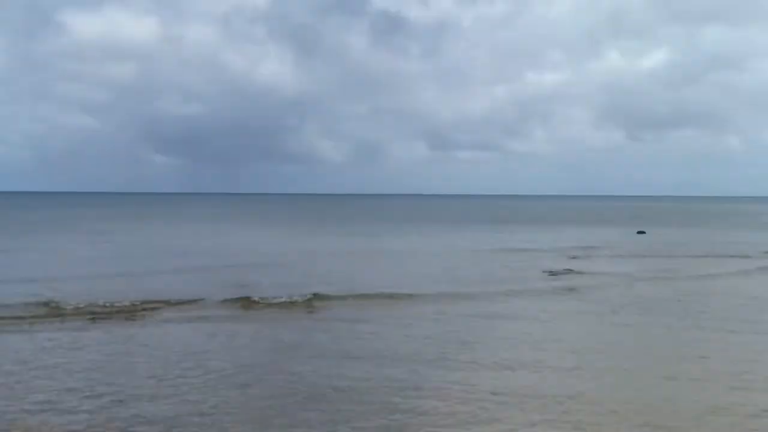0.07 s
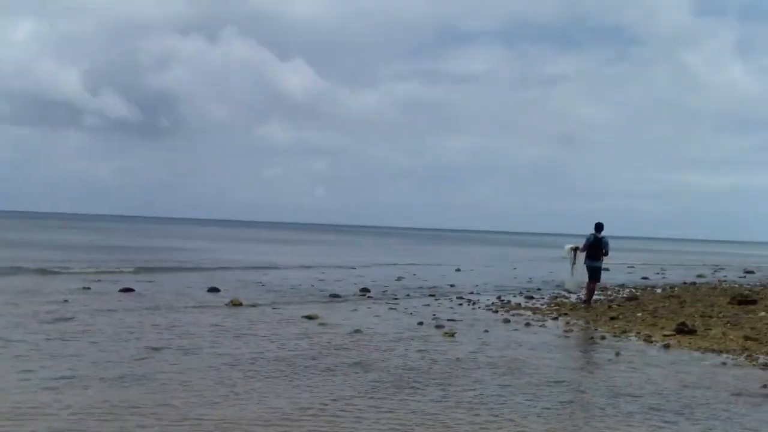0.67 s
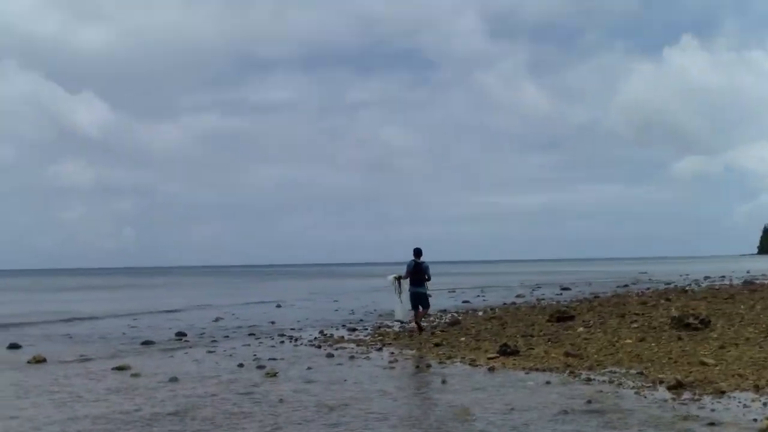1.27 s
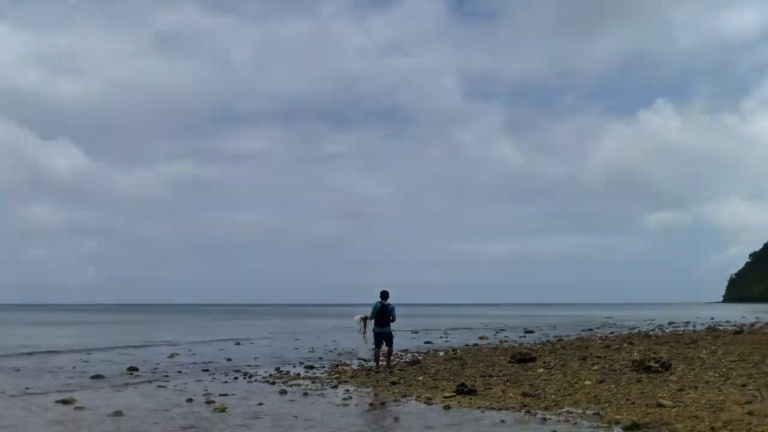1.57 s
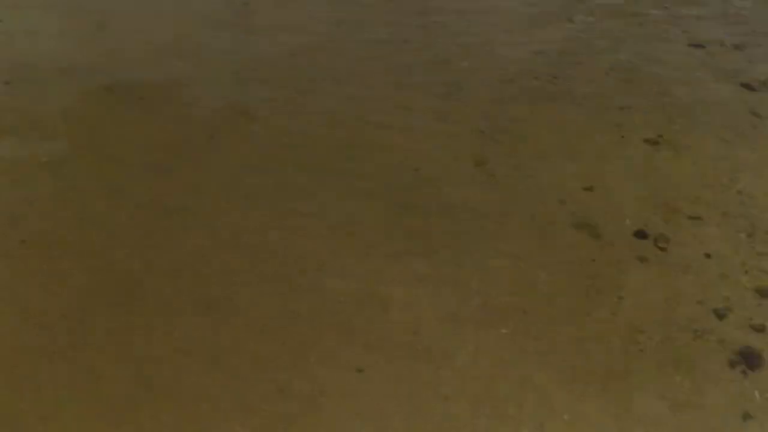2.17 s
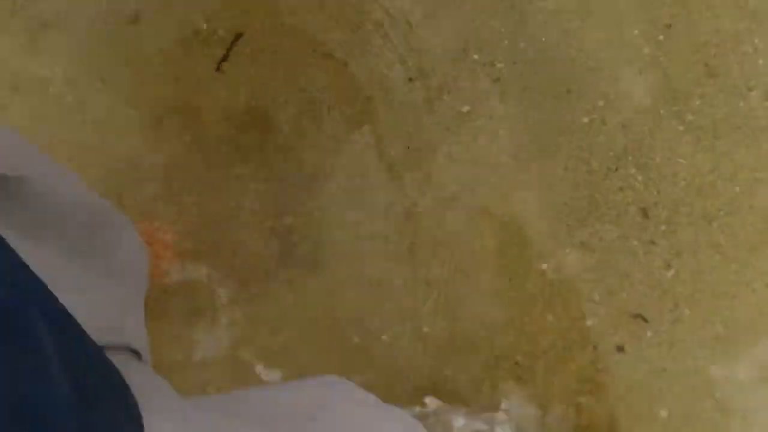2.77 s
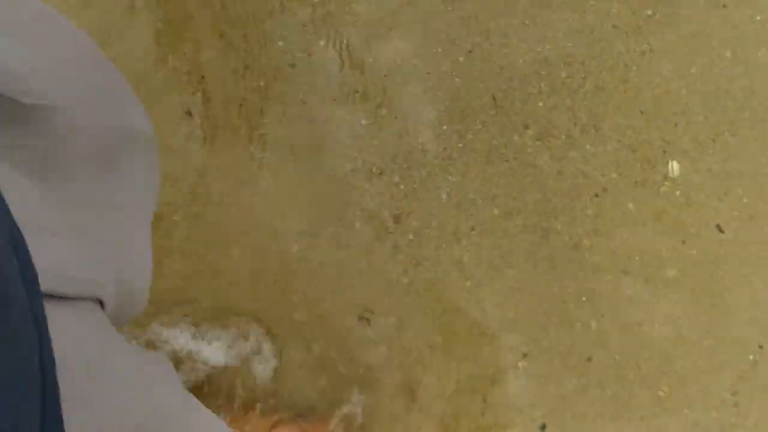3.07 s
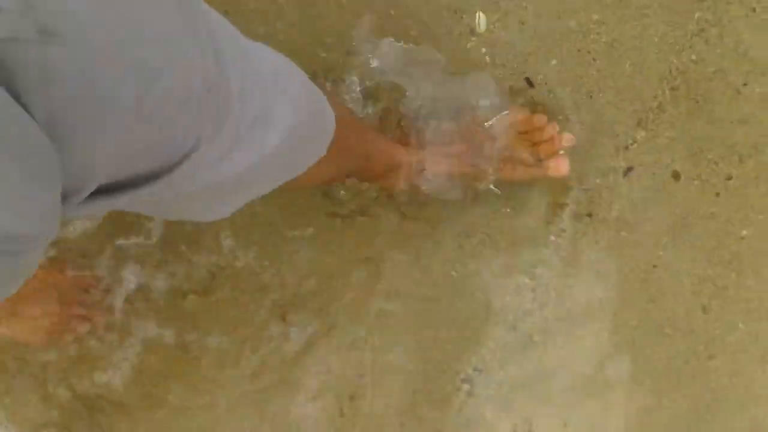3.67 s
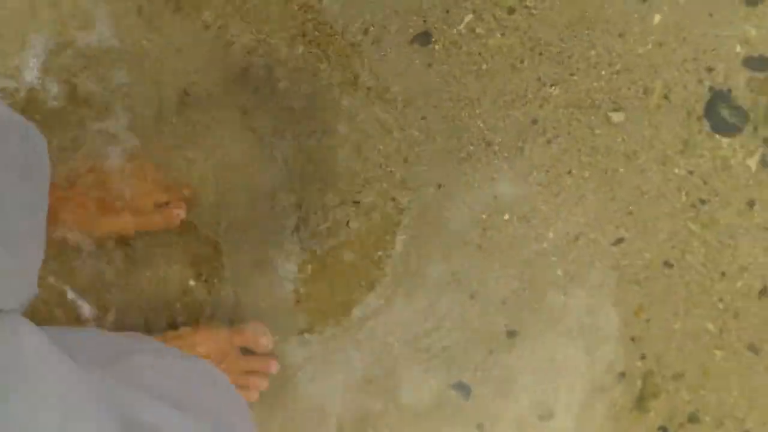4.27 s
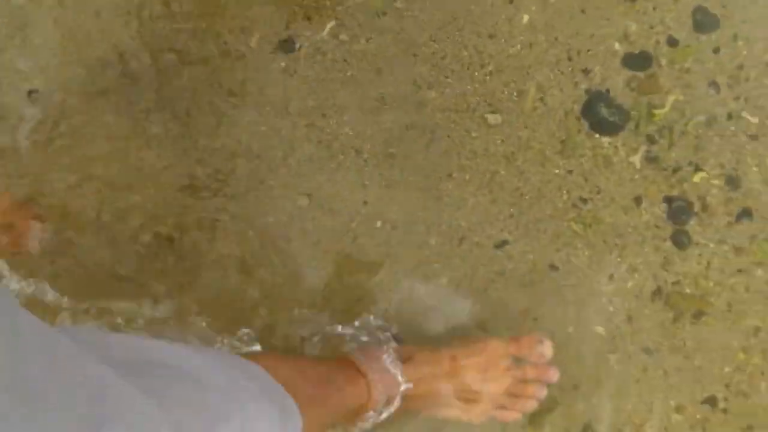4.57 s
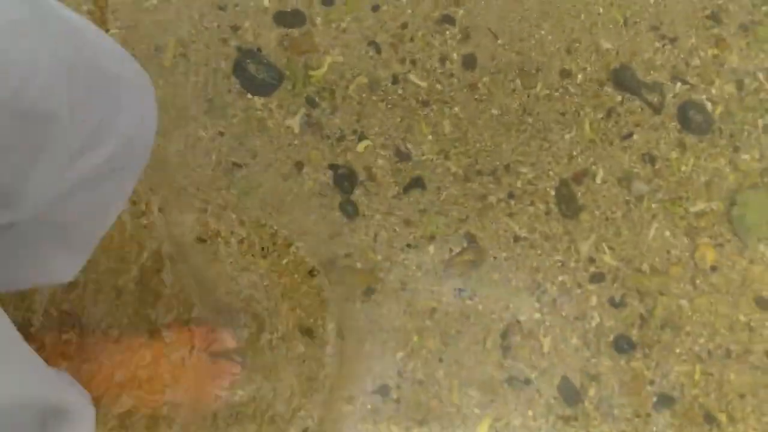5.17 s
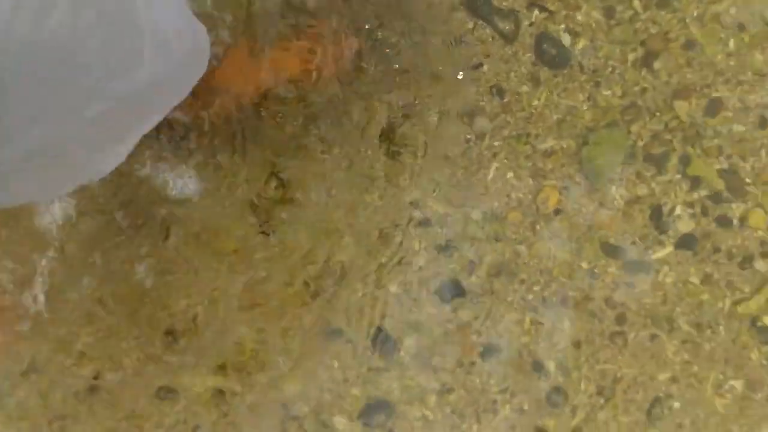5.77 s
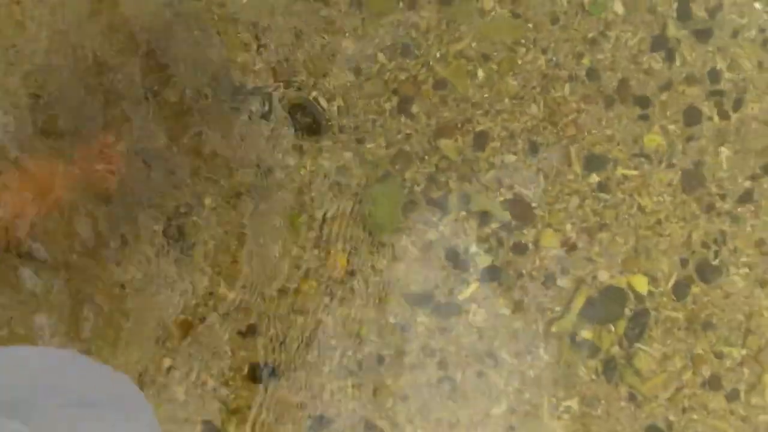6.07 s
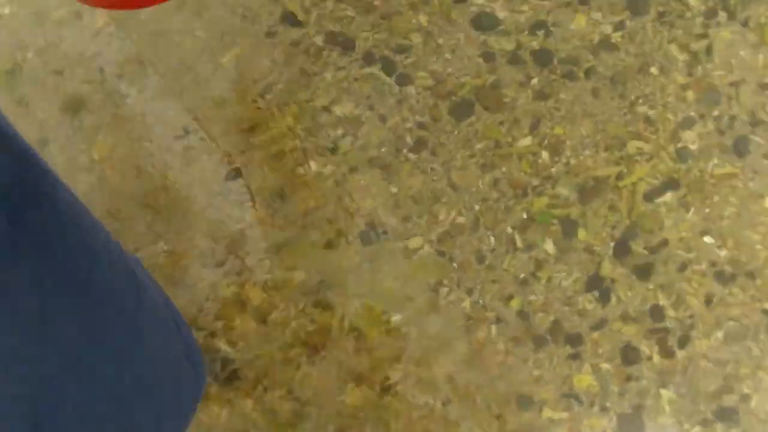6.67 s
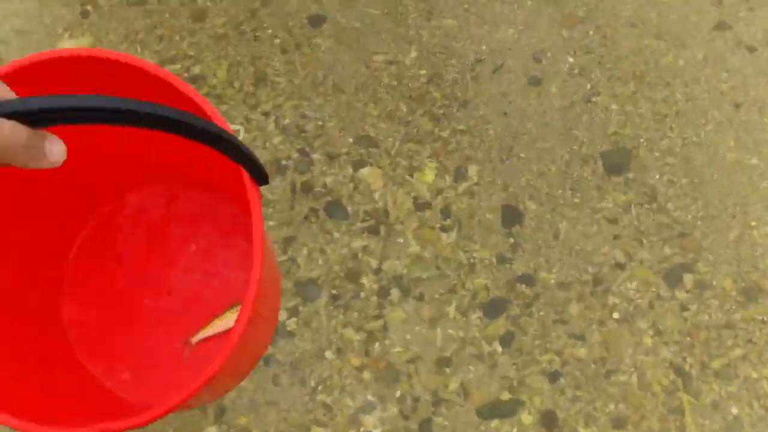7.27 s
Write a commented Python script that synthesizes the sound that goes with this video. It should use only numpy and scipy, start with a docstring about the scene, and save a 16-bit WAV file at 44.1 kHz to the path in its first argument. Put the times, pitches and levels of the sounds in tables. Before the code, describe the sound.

At the edge of a calm sea, wind rumbles and flutters against the microphone, briefly overloading it, over a faint wash of little waves. Then close, unhurried steps push through shallow water, about seven in all, each a swishing slosh with gulps, plops and bright falling droplets. The buffeting is heaviest in the first half and comes back in lighter puffs between the splashes.

```python
"""At the seashore, bare feet wade through ankle-deep water, about one stride a second, close by.
Each stride folds air into the water, which rings as bubbles, gulps and plops, and throws spray
that patters back. Small waves wash the shore behind. Gusts buffet the microphone with rumble,
flutter and thumps, and the hardest ones overload it into thin crackles."""
import sys
import numpy as np
from scipy.fft import rfft, irfft, next_fast_len
from scipy.io import wavfile
from scipy.ndimage import uniform_filter1d, map_coordinates

SR = 44100
rng = np.random.default_rng(int(sys.argv[2]) if len(sys.argv) > 2 else 0)


def file_out(sig):
    """Save sig as 16-bit WAV at sys.argv[1]."""
    # one column per channel
    cols = np.atleast_2d(sig).T
    # limit, then scale
    lim = np.clip(cols, -1, 1)
    pcm = np.round(lim * 32767).astype(np.int16)
    wavfile.write(sys.argv[1], SR, pcm)


N = 327222

# the microphone turns from the open sea down to the feet: time_s, nearness (0 far, 1 close)
NEARNESS = [(0, .4), (.7, .15), (1.9, .15), (2.3, .8), (2.9, 1), (7.42, 1)]


def stride_db(t, build_s, hold_s, settle_s):
    """A leg gathers speed, pushes steadily and stops; t counts from the full push."""
    sweep_db, bend = 12.5, 1.17  # depth of the build-up and settling; steepening of the tails
    away = np.maximum(-t / build_s, 0) + np.maximum((t - hold_s) / settle_s, 0)
    return -sweep_db * np.minimum(away, 10) ** bend


def water_levels():
    """Slosh and spray envelopes in dB: strides and splashes over a bed of shore waves."""
    # a leg sweeps the water: push_s, build_s, hold_s, settle_s, slosh_db, spray_db, spray_lag_s
    strides = [(2.168, .24, 0.12, .28, -41.5, -45, 0.077), (2.968, .19, 0.16, .07, -40.5, -42.5, 0.043),
               (3.611, 0.34, .28, 0.11, -40, -42, 0), (4.776, 0.61, 0.066, 0.22, -41.5, -41.5, 0),
               (5.574, 0.35, 0.15, 0.22, -39.5, -42, 0.022), (6.535, 0.25, 0.23, 0.14, -38, -40, 0.017),
               (7.328, 0.09, 0.031, .06, -49, -43.5, 0.0051)]
    # a foot breaks the surface: peak_s, slosh_db, spray_db
    splashes = [(2.185, -36, -55), (2.725, -37, -45), (3.439, -42.5, -38.5), (3.93, -41, -47.5),
                (4.365, -47.5, -44.5), (4.832, -38.5, -41.5), (4.97, -40.5, -58), (5.585, -46, -35.5),
                (5.87, -46, -48), (6.369, -41.5, -41.5)]
    # small waves; twice the level drops abruptly and creeps back: time_s, wash_db, hiss_db
    shore_waves = [(0, -47.5, -51.5), (.152, -50, -47.5), (.172, -60, -61.5), (.57, -57.5, -60.5),
                   (.83, -50, -50), (.92, -52, -54), (1.22, -47.5, -48.5), (1.29, -54.5, -53),
                   (1.52, -50.5, -54.5), (1.545, -60, -65.5), (1.7, -56, -57), (1.87, -52.5, -59.5),
                   (2.05, -46.5, -49.5), (2.6, -51.5, -53), (2.82, -45.5, -48.5), (3.25, -50, -52),
                   (4.1, -51.5, -52), (5.2, -49.5, -54), (6.15, -54.5, -51.5), (7.05, -46.5, -48.5),
                   (7.42, -45, -48.5)]
    attack_s, t60_s = 0.018, 0.34  # splash envelope
    t = np.arange(N) / SR
    sloshes, sprays = ([level] for level in curves(shore_waves))
    for s, build_s, hold_s, settle_s, slosh_db, spray_db, lag_s in strides:
        sloshes.append(slosh_db + stride_db(t - s, build_s, hold_s, settle_s))
        sprays.append(spray_db + stride_db(t - s - lag_s, build_s, hold_s, settle_s))
    for s, slosh_db, spray_db in splashes:
        away = np.maximum((s - t) / attack_s, (t - s) / t60_s)
        shape_db = -60 * np.minimum(away, 2)
        sloshes.append(slosh_db + shape_db)
        sprays.append(spray_db + shape_db)
    return together(sloshes), together(sprays)


def slosh(slosh_db):
    """Water folds round the shins: a rush full of bubbles, and deep gulps when the push is hard."""
    near, = curves(NEARNESS)  # far water blurs into a smooth wash
    push = near * np.clip((slosh_db + 55) / 16, 0, 1)  # 0 = lapping ripples, 1 = full stride
    # tone of churning water: frequency_hz, level_db
    rush_spectrum = [(120, -13), (300, -5), (520, -3), (1050, 0), (1700, -4.5), (2800, -10.5), (4500, -29),
                     (8000, -19.5), (16000, -77)]
    rush = amp(-2.5 - 3.5 * push + 2.5 * push * wobble(60)) * noise(rush_spectrum)
    fine = swarm(per_s=320, lo_hz=1406, hi_hz=3197, cycles=49, rise=0.1, spread_db=5, samples=1400)
    bubbles = swarm(per_s=220, lo_hz=647.6, hi_hz=1729, cycles=28, rise=0.3, spread_db=2.5, samples=2100)
    gulps = swarm(per_s=90, lo_hz=311.7, hi_hz=850, cycles=37, rise=0.39, spread_db=2.5, samples=3000)
    fine *= push * amp(-5)
    bubbles *= amp(-11 + 4.8 * near + 3.45 * push)
    gulps *= amp(-11.5 + 8.3 * push)
    return amp(slosh_db) * (rush + fine + bubbles + gulps)


def spray(spray_db):
    """Thrown water patters back as tiny drops over a fine fizz; a harder splash is more grainy."""
    # fine mist, with a sheen from the microphone port ringing near 9.6 kHz: frequency_hz, level_db
    fizz_spectrum = [(900, -6), (2200, 3), (3300, -1), (5200, -2.5), (6300, -5.5), (7700, -6.5),
                     (8900, -2.5), (9600, 2), (10700, -4), (12000, -10.5), (14000, -12.5), (16000, -17)]
    # tone of the landing droplets: frequency_hz, level_db
    patter_spectrum = [(1500, -25), (3000, -6.5), (4500, -6), (6300, -9), (8000, -4), (9600, 2),
                       (10800, -2), (12000, -11), (16000, -9)]
    near, = curves(NEARNESS)
    thrown = near * np.clip((spray_db + 58) / 15, 0, 1)  # 0 = distant hiss, 1 = spray at the feet
    fizz = amp(1.5 - 4.9 * thrown) * noise(fizz_spectrum)
    droplets = swarm(per_s=2000, lo_hz=2980, hi_hz=13530, cycles=32, rise=0.06, spread_db=5, samples=320)
    patter = thrown * amp(-1) * coloured(droplets, patter_spectrum)
    clumps = amp(2.85 * thrown * wobble(120))  # sheets of water break up in bunches
    return amp(spray_db - 1) * clumps * (fizz + patter)


def plops():
    """An air cavity slaps shut and rings, its pitch rising."""
    # single large bubbles: start_s, level_db, pitch_hz
    cavities = [(.034, -39, 944), (0.537, -40, 1016), (0.553, -40.5, 637), (1.936, -35.5, 650),
                (2.186, -27, 1250), (2.26, -37, 854), (2.305, -32.5, 367), (2.825, -32.5, 1620),
                (2.963, -26, 1127), (3.158, -32.5, 714), (3.289, -36.5, 1430), (3.595, -25.5, 1010),
                (3.61, -24.5, 1930), (3.762, -31, 680), (3.844, -32, 334), (3.921, -31.5, 1910),
                (3.966, -35, 617), (4.285, -36, 825), (4.368, -30.5, 1570), (4.751, -28, 422),
                (4.826, -28, 1390), (5.186, -36, 726), (5.262, -36, 520), (5.316, -32.5, 816),
                (5.515, -27, 974), (5.59, -24.5, 2100), (5.62, -26.5, 630), (5.724, -29, 437),
                (5.881, -36, 545), (6.353, -30.5, 690), (6.454, -31.5, 1470), (6.56, -26, 817),
                (6.584, -29.5, 910), (6.65, -28.5, 1290), (6.726, -27.5, 342), (6.728, -25, 970),
                (6.797, -28, 486), (6.829, -32, 1070), (7.118, -35, 1010), (7.33, -25.5, 2146),
                (7.383, -34, 1540)]
    out, t = np.zeros(N), np.arange(SR // 8) / SR
    for s, db, hz in cavities:
        slap = amp(-11) * splat(t, hz, t60_s=0.069)
        ring = bubble(t, hz * .97, cycles=33.3, rise=0.27)
        add(out, s, amp(db + 4) * (ring + slap))
    return out


def drops(scatter_s=0.018):
    """A big drop: a smack and the ping of its bubble, among smaller droplets that land around it."""
    # drops hitting the surface: start_s, level_db, pitch_hz
    big_drops = [(.0975, -32, 4540), (0.276, -36.5, 5030), (1.427, -35.5, 3620), (2.307, -22, 9200),
                 (2.962, -24, 9600), (3.6669, -21, 9200), (3.8252, -13.5, 9300), (3.8746, -31, 4040),
                 (4.7863, -26.5, 2910), (4.833, -21, 10000), (4.855, -21, 9600), (4.9025, -25, 9400),
                 (4.965, -18, 9000), (4.9844, -25.5, 4080), (5.625, -25, 5100), (5.765, -19, 9300),
                 (5.8855, -26.5, 10000), (6.3718, -25.5, 2640), (6.6937, -23, 3060), (6.7114, -19, 9700),
                 (6.764, -22, 2840), (6.7984, -25.5, 2530), (6.868, -24.5, 4360), (6.9304, -25, 9600),
                 (7.348, -20, 10200)]
    out, t = np.zeros(N), np.arange(SR // 20) / SR
    for s, db, hz in big_drops:
        smack = amp(-7.5) * splat(t, hz, t60_s=0.012)
        ping = amp(2.5) * bubble(t, hz, cycles=36.6, rise=.04)
        add(out, s + 0.00057, amp(db) * (smack + ping))
        for delay, pitch, softness in rng.random((7, 3)):
            droplet = bubble(t, hz * (0.77 + .45 * pitch), cycles=32, rise=.06)
            add(out, s + scatter_s * (delay - .1), amp(db - 11 - 10 * softness) * droplet)
    return out


def bubble(t, hz, cycles, rise):
    """A trapped air pocket: soft start, 60 dB down after its cycles, pitch rising as it surfaces."""
    age = t * hz / cycles
    tone = np.sin(2 * np.pi * hz * t * (1 + rise * age / 2))
    attack = 1 - np.exp(-2 * t * hz)
    return tone * amp(-60 * age) * attack


def swarm(per_s, lo_hz, hi_hz, cycles, rise, spread_db, samples):
    """A cloud of bubbles of random pitch, life and strength; rms 1, even power per octave."""
    when, pitch, life, softness = rng.random((int(per_s * N / SR), 4)).T[:, :, None]
    hz = lo_hz * (hi_hz / lo_hz) ** pitch
    gain = np.sqrt(hz) * amp(-spread_db * np.log(softness + 0.0083))  # a few stand out
    k = np.arange(samples)
    fade = 1 - (k / samples) ** 2
    rings = gain * bubble(k / SR, hz, cycles * 2 ** (life - .5), rise) * fade
    positions = (when * N).astype(int) + k
    return unit(np.bincount(positions.ravel(), rings.ravel(), N)[:N])


def splat(t, hz, t60_s):
    """A short slap of water: dying noise about an octave wide around hz."""
    band = [(hz / 5, -45), (hz / 1.7, -7), (hz, 0), (hz * 1.3, -6), (hz * 7, -42)]
    return amp(-60 * t / t60_s) * noise(band, len(t))


def wind():
    """Slow pressure swings and faster eddies; the hardest gusts break into a higher flutter."""
    # wind on the microphone in three bands, low to high: frequency_hz, level_db
    rumble_spectrum = [(8, -18), (22, 4), (42, 0.5), (65, -6), (90, -10), (150, -35), (400, -81),
                       (900, -120)]
    eddy_spectrum = [(35, -52), (70, -3), (100, -1.5), (135, -6.5), (180, -15), (260, -24.5), (400, -42),
                     (1000, -63), (4000, -110)]
    flutter_spectrum = [(80, -11), (150, 3), (210, 0), (290, -5), (380, -16.5), (520, -20), (1000, -40),
                        (4000, -59), (12000, -90)]
    buffet_db, eddy_db = wind_levels()
    gust = np.clip((eddy_db + 31.5) / 16, 0, 1)
    rumble = amp(buffet_db + 4 * wobble(22)) * turbulence(rumble_spectrum, steady_s=0.1056)
    eddies = amp(3.2 * wobble(35)) * turbulence(eddy_spectrum, steady_s=0.038)
    flutter = amp(-22 + 18.2 * gust + 6.9 * wobble(50)) * turbulence(flutter_spectrum, steady_s=0.0426)
    return rumble + amp(eddy_db) * (eddies + flutter)


def wind_levels():
    """Buffeting and eddy envelopes in dB: the breeze plus a bell-shaped swell for each gust."""
    # the bed of moving air: time_s, buffet_db, eddy_db
    breeze = [(0, -31, -53), (.08, -34, -43), (.3, -33, -44), (.66, -31, -44.5), (.78, -24.5, -27),
              (1.8, -24, -26.5), (1.93, -21.5, -37), (2.27, -26.5, -37.5), (3.08, -22.5, -27),
              (3.23, -29.5, -49), (3.88, -29, -44), (4.1, -41, -63), (4.55, -30.5, -47), (5.32, -49.5, -62),
              (5.47, -39.5, -63), (5.84, -27, -45), (6.1, -44.5, -66), (6.4, -30.5, -53),
              (7.15, -33.5, -61), (7.42, -21, -47)]
    # swells on top of it: middle_s, half_length_s, buffet_db, eddy_db
    gusts = [(0.16, 0.037, -15.5, -23.5), (0.896, 0.026, -26, -23.5), (1.238, 0.019, -16, -18),
             (1.373, .04, -21.5, -22.5), (1.523, 0.013, -14, -20), (1.713, 0.046, -19, -19),
             (1.819, 0.035, -14.5, -24.5), (2.198, 0.037, -20.5, -26.5), (2.458, 0.036, -16, -26),
             (2.622, 0.009, -12.5, -31.5), (2.745, 0.019, -16, -19.5), (2.938, 0.023, -13.5, -21),
             (3.142, 0.023, -15.5, -25.5), (3.286, 0.028, -19, -32), (3.492, 0.038, -16.5, -27),
             (3.659, 0.015, -40, -30), (3.779, 0.036, -17.5, -32.5), (4.342, 0.059, -25.5, -36.5),
             (4.443, .035, -18.5, -32), (4.756, 0.024, -25.5, -25), (4.871, 0.024, -21.5, -40),
             (5.514, .03, -30.5, -49), (5.87, 0.024, -23, -41), (6.332, 0.047, -24.5, -22.5),
             (6.556, 0.022, -30, -38), (6.676, 0.031, -23, -33.5), (6.901, 0.044, -25, -34.5),
             (7.055, 0.02, -24, -31), (7.3, 0.052, -21.5, -34), (7.373, 0.038, -14.5, -38)]
    t = np.arange(N) / SR
    power = amp(curves(breeze)) ** 2
    for s, half_s, buffet_db, eddy_db in gusts:
        swell = np.exp(-2 * np.minimum(((t - s) / half_s) ** 2, 20))
        power += amp([[buffet_db], [eddy_db]]) ** 2 * swell
    return 10 * np.log10(power)


def turbulence(spectrum, steady_s):
    """Lumpy pressure noise whose strength stays even over spans longer than steady_s."""
    pressure = noise(spectrum)
    local_power = np.abs(uniform_filter1d(pressure ** 2, int(steady_s * SR)))
    return pressure / np.sqrt(local_power + 0.005)


def puffs(swing_s=0.0015):
    """An eddy hits the microphone head-on, pushing and pulling its diaphragm; two weaker ones follow."""
    # sudden slaps of wind: time_s, level_db
    slaps = [(0.877, -6.5), (1.034, -15), (1.241, -6.5), (1.343, -9.5), (1.389, -9), (1.508, -4.5),
             (1.596, -12.5), (1.702, -11.5), (1.748, -11), (1.824, -10), (2.344, -10.5), (2.422, -16),
             (2.451, -16), (2.542, -13.5), (2.722, -10), (2.764, -7), (2.828, -11.5), (2.92, -8.5),
             (2.992, -13), (3.056, -11), (3.472, -16.5)]
    out, t = np.zeros(N), np.arange(SR // 25) / SR - .02
    for s, db in slaps:
        for k, (late, width) in enumerate(rng.random((3, 2))):
            u = t / (swing_s * 2 ** (1.34 * (width - .5)))
            push_pull = u / (1 + u ** 2 / 5) ** 4
            lag_s = k * (0.00509 + 0.007 * late)
            add(out, s - .017 + lag_s, amp(db + 5 - 6.9 * k) * push_pull)
    return out


def crackle(t60_s=0.0038):
    """A gust overloads the microphone; each overload leaves one dry tick."""
    # moments of overload: start_s, level_db
    overloads = [(.157, -29), (.887, -34), (1.253, -36), (1.363, -29), (1.509, -25), (1.528, -30),
                 (1.5997, -30.5), (1.619, -36), (1.6304, -33.5), (1.704, -36), (1.7497, -32), (1.8024, -34),
                 (1.8216, -39), (1.8435, -28.5)]
    # tone of one tick: frequency_hz, level_db
    tick_spectrum = [(200, -16), (700, 4.5), (2000, -22), (6000, -22.5), (11000, -28), (16000, -28)]
    out, t = np.zeros(N), np.arange(SR // 100) / SR
    for s, db in overloads:
        add(out, s, amp(db + 3 - 60 * t / t60_s) * noise(tick_spectrum, len(t)))
    return out


def amp(db):
    """Decibels to gain."""
    return 10 ** (np.asarray(db) / 20)


def together(levels_db):
    """Level in dB of independent sounds heard at once."""
    return 10 * np.log10(np.sum(amp(levels_db) ** 2, axis=0))


def unit(x):
    """Scaled to rms 1."""
    return x / np.sqrt(np.mean(x ** 2) + 1e-20)


def curves(rows):
    """One value per sample for each column after the time."""
    times_s, *columns = np.transpose(rows)
    return [np.interp(np.arange(N) / SR, times_s, column) for column in columns]


def wobble(knots_per_s):
    """A smooth curve through random knots."""
    knots = rng.standard_normal(int(N * knots_per_s / SR) + 4)
    return map_coordinates(knots, [np.arange(N) * knots_per_s / SR])


def filtered(x, response):
    """x through a filter whose gain is response(hz)."""
    size = next_fast_len(len(x) + 8192)
    hz = np.fft.rfftfreq(size, 1 / SR)
    return irfft(rfft(x, size) * response(hz), size)[:len(x)]


def coloured(x, spectrum):
    """x equalised by (frequency_hz, level_db) points, at rms 1."""
    points_hz, db = np.transpose(spectrum)
    return unit(filtered(x, lambda hz: amp(np.interp(np.log(hz + 1), np.log(points_hz), db))))


def noise(spectrum, samples=N):
    """Noise with the given spectrum, at rms 1."""
    return coloured(rng.standard_normal(samples), spectrum)


def add(track, s, sound):
    """Mix a sound into the track at time s."""
    part = track[max(round(s * SR), 0):][:len(sound)]
    part += sound[:len(part)]


def scene():
    """Water below, wind at the microphone, in mono."""
    slosh_db, spray_db = water_levels()
    air = wind() + puffs() + crackle()
    water = slosh(slosh_db) + spray(spray_db) + plops() + drops()
    return (water + air)[None]


def record(dry):
    """The strongest gusts flatten against the microphone's limit; nothing passes above the band edge."""
    ceiling, hardness, edge_hz = .46, 6, 16100
    squashed = dry[0] / (1 + np.abs(dry[0] / ceiling) ** hardness) ** (1 / hardness)
    return filtered(squashed, lambda hz: hz < edge_hz)[None]


dry = scene()
out = record(dry)
file_out(out)
```